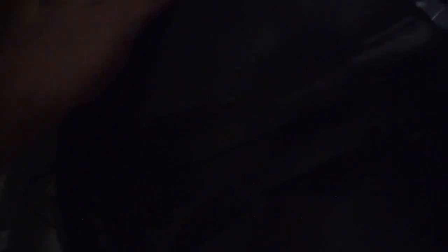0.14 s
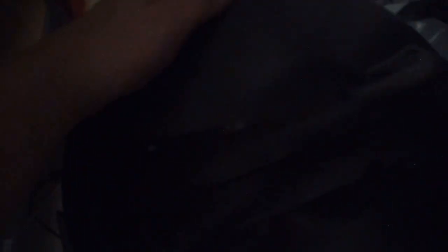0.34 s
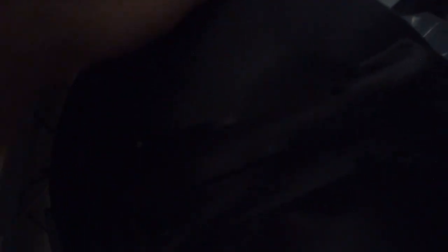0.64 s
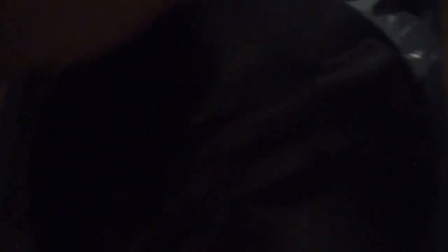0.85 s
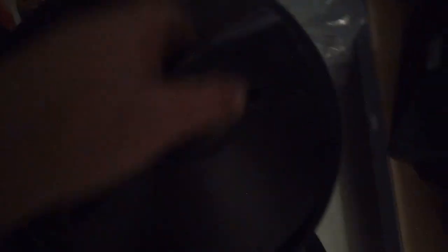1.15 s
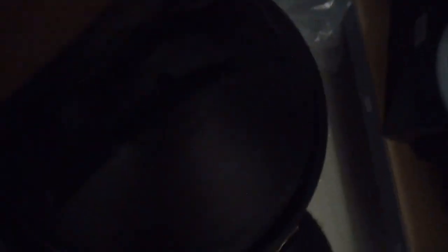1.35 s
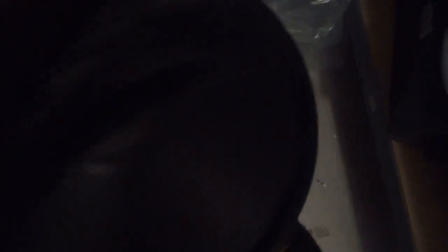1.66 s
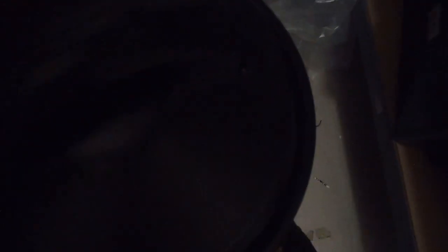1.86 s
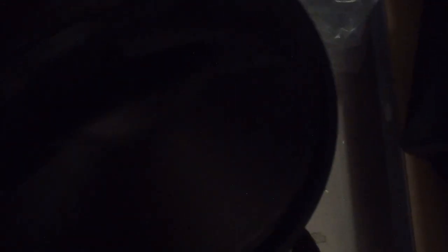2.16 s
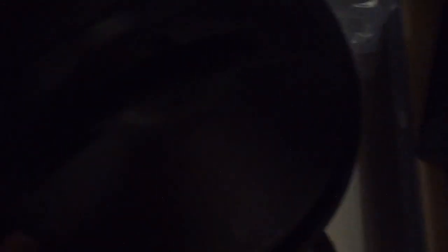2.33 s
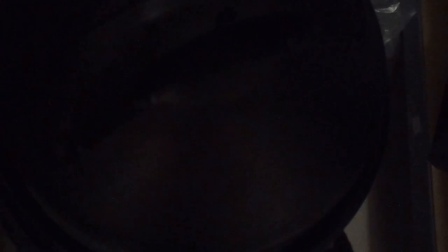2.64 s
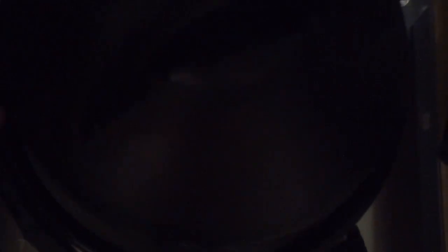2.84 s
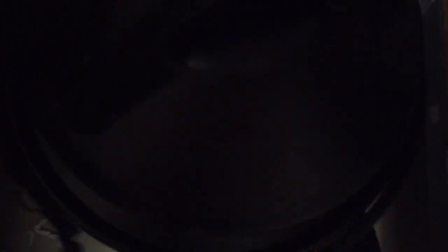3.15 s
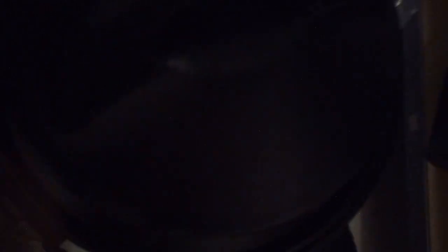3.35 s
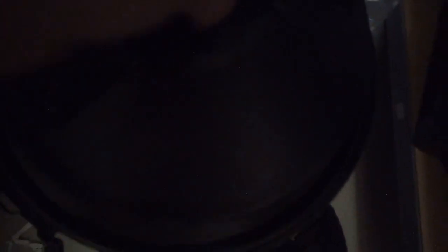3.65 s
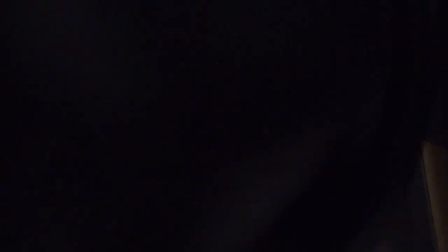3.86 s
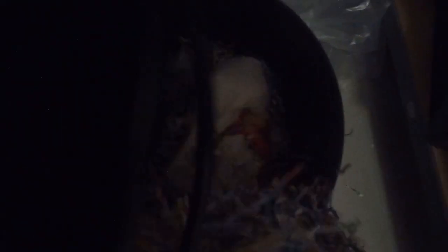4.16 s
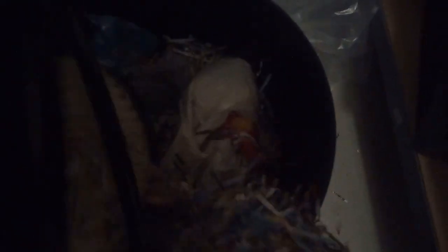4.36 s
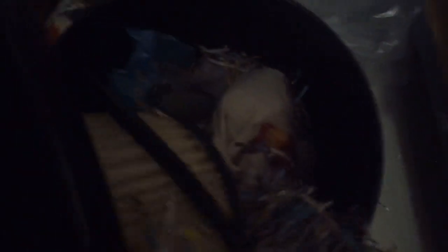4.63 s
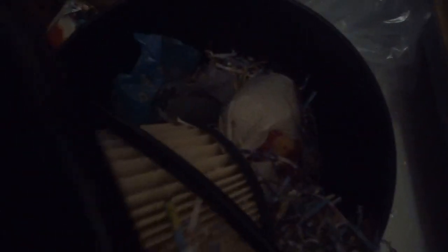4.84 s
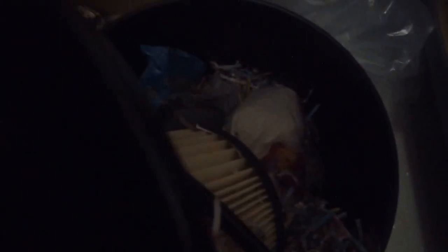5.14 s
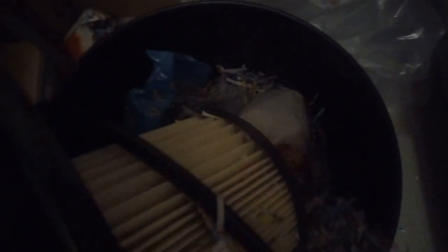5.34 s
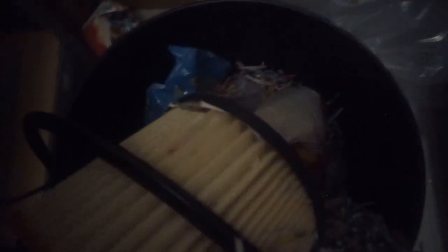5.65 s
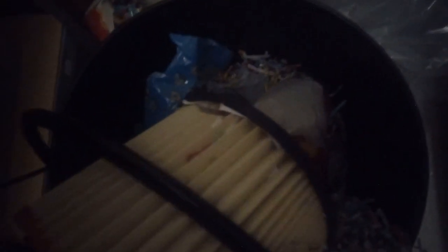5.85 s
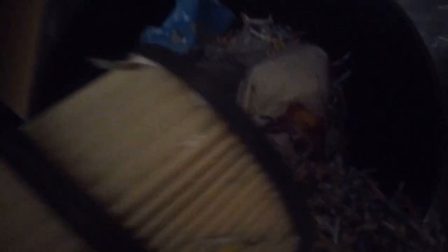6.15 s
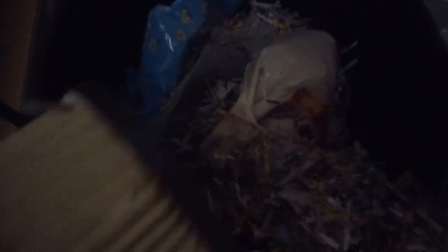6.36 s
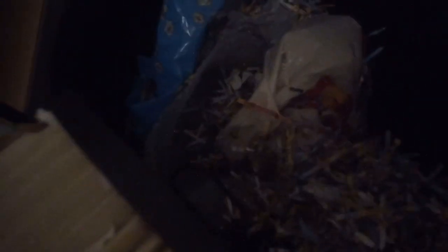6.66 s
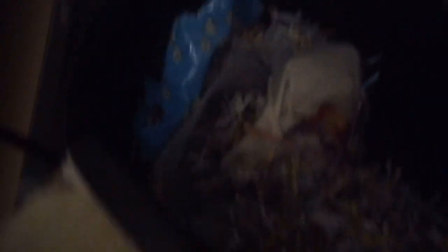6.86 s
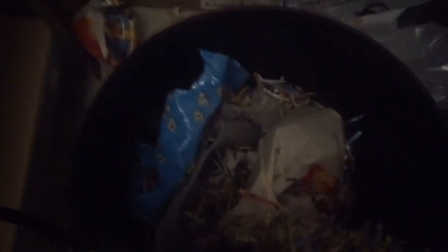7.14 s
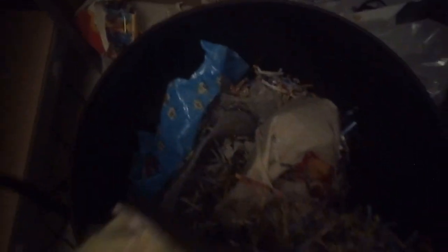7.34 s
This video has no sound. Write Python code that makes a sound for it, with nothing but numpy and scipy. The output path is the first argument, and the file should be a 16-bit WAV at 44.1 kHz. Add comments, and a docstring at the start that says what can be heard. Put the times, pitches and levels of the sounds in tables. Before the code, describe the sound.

Close, slightly dull small microphone indoors: loud vacuum motor whine and hissing exhaust for barely half a second, then switch-off and a smooth descending wind-down over about two seconds. After a brief lull come plastic snaps, gritty scrapes and hollow drum thuds, busiest around the middle, thinning into light ticks, a soft bump and dry rustling in a quiet room.

```python
"""A shop vacuum's motor whines at full speed, is switched off and coasts to rest near a small microphone indoors.
Its tones are multiples of the shaft rate, coloured by housing and outlet; its air is shaped turbulent noise.
Then the plastic lid is unlatched, dragged off the drum and knocked about; dry debris and the filter rustle.
Friction is stroked noise, knocks are decaying noise, thuds are pushed resonances and slides are gliding noise.
A short diffuse tail and a quiet room lie behind; microphone and input limit band and peaks."""
import sys
import numpy as np
from scipy import signal
from scipy.fft import rfft, irfft, next_fast_len
from scipy.io import wavfile
from scipy.ndimage import uniform_filter1d, map_coordinates

SR = 44100
rng = np.random.default_rng(int(sys.argv[2]) if len(sys.argv) > 2 else 0)


def inscribe(sig):
    """Save sig as 16-bit PCM at rate SR to the path in sys.argv[1].

    A 1-D sig is mono; a 2-D sig holds one channel per row.
    Samples are clipped to [-1, 1] before scaling.
    """
    pcm = np.round(np.clip(np.atleast_2d(sig).T, -1, 1) * 32767)
    wavfile.write(sys.argv[1], SR, pcm.astype(np.int16))


N = 330750


def amp(db):
    """Level law: decibels to an amplitude ratio."""
    return 10 ** (np.asarray(db) / 20)


def unit(x):
    """Normalisation to an rms of 1."""
    return x / np.sqrt(np.mean(x ** 2) + 1e-20)


def along(points, hz):
    """Interpolation of (frequency, value) points on a logarithmic frequency axis."""
    f, v = np.transpose(points)
    return np.interp(np.log(hz + 1), np.log(f + 1), v)


def wobble(rate):
    """Slow random modulation: a smooth curve through random knots, rate of them a second."""
    knots = rng.standard_normal(int(N * rate / SR) + 4)
    return map_coordinates(knots, [np.arange(N) * rate / SR])


def filtered(x, response):
    """Linear filtering: the spectrum times a complex response of frequency."""
    m = next_fast_len(N + SR // 2)
    return irfft(rfft(x, m) * response(np.fft.rfftfreq(m, 1 / SR)), m)[..., :N]


def ringing(modes):
    """Modal superposition: a sum of causal resonances of alternating sign."""
    def response(f):
        total = 0
        for k, (centre, width, db) in enumerate(modes):
            damping = 1j * f * width
            total = total + (-1) ** k * amp(db) * damping / (centre * centre - f * f + damping)
        return total
    return response


def shaped(points):
    """Spectral colouring: a real gain of frequency."""
    return lambda f: amp(along(points, f))


def rush(response, grit_db, streak_db=0):
    """Coloured noise of rms 1: grit makes it lumpy, streaks are narrow resonances that come and go."""
    gritty = rng.standard_normal(N) * amp(grit_db * wobble(400))
    spectrum = signal.stft(gritty, nperseg=512)[2]
    field = uniform_filter1d(rng.standard_normal(spectrum.shape), size=2, axis=0)  # across frequency
    field = uniform_filter1d(field, size=12, axis=1)  # across time
    streaked = signal.istft(spectrum * amp(streak_db * unit(field)), nperseg=512)[1][:N]
    return unit(filtered(streaked, response))


ATTACK_S, RELEASE_S = 0.059, 0.31  # time to rise by 30 dB; time to fall by 60 dB


def strokes(rows):
    """Energy addition: strokes rise, hold and die exponentially; one gain for each level column."""
    start, length, db, *over = np.transpose(rows)[..., None]
    t = np.arange(0, N / SR + .01, .002)
    rise_db = 30 * np.clip(start - t, 0, 9) / ATTACK_S
    fall_db = 60 * np.clip(t - start - length, 0, 9) / RELEASE_S
    shape_db = db - rise_db - fall_db
    gains = []
    for over_db in [0, *over]:
        power = np.sum(amp(2 * (shape_db + over_db)), 0)
        gains.append(np.interp(np.arange(N) / SR, t, np.sqrt(power)))
    return gains


# Spectrum of the quiet room: (frequency [Hz], relative density [dB])
QUIET_ROOM = [(25, -14.5), (100, 9), (300, -2), (600, -7.5), (1500, -9), (3000, -14), (4500, -14.5),
              (6000, -10.5), (16000, -8)]


def hush():
    """Stationary background noise: a faint coloured rush."""
    return amp(-65.5) * rush(shaped(QUIET_ROOM), grit_db=-0.5)


def room(x):
    """Diffuse reverberation: exponentially decaying noise convolved with the sound."""
    t = np.arange(SR // 2) / SR
    tail = rng.standard_normal(len(t)) * amp(-60 * t / 0.12)  # t60 0.12 s
    delayed = np.pad(x, (300, 0))  # samples
    return signal.fftconvolve(delayed, tail / np.linalg.norm(tail))[:N]


# Low handling rumble at the microphone: (time [s], length [s], rumble level [dB])
HANDLING_RUMBLES = [(0, 0.58, -48), (.72, 0.12, -40), (1.15, .26, -38), (1.5, 0.036, -49.5)]
# Spectrum of the rumble: (frequency [Hz], relative density [dB])
RUMBLE_COLOUR = [(25, -33), (60, 0), (130, 0), (170, -1.5), (250, -24)]


def handling_rumble():
    """Low-frequency contact noise: low handling rumble at the microphone, in strokes."""
    return strokes(HANDLING_RUMBLES)[0] * amp(3 * wobble(12)) * rush(shaped(RUMBLE_COLOUR), grit_db=1)


# Resonances of the plastic lid: (frequency [Hz], width [Hz], relative level [dB])
LID_MODES = [(590, 78, -10.5), (772, 38, 2.5), (835, 66, 3), (977, 200, -6), (1240, 88, 1), (1433, 200, -4),
             (1772, 42, -6.5)]
# Resonances of the drum: (frequency [Hz], width [Hz], relative level [dB])
DRUM_MODES = [(80.5, 71, -5.5), (139, 14, 2.5), (198, 23, 4), (254, 41, 6.5), (297, 44, 7.5),
              (351, 202, -3.5), (610, 89, -9)]
# Thuds: (time [s], relative tone level [dB], tone frequency [Hz], rise time constant [s], t60 [s],
#         relative push level [dB])
THUD_EVENTS = [(0.36, -27, 137.6, 0.051, 0.22, -69), (3.211, -25.5, 215, 0.013, 0.21, -34.5),
               (3.564, -37.5, 88, 0.0083, 0.21, -31), (3.693, -19, 234.3, 0.014, 0.11, -37.5),
               (3.837, -27, 98.2, 0.0023, 0.16, -54.5), (3.852, -16.5, 305, 0.0016, 0.034, -30.5),
               (4.036, -24, 837, 0.002, 0.25, -26), (4.081, -18, 290.5, 0.018, 0.32, -50),
               (4.246, -25.5, 92.5, 0.0045, 0.13, -20.5), (4.547, -27.5, 204.8, 0.0022, 0.13, -29.5),
               (4.771, -24, 139.8, 0.06, 0.22, -69), (6.294, -22.5, 138, 0.0028, 0.13, -23),
               (6.298, -29, 683, 0.0012, 0.077, -56), (6.419, -25, 213, 0.0029, 0.064, -58)]


def thuds():
    """Impulsive excitation: a soft push rings drum and lid; one hollow tone swells and dies above the rest."""
    hollow, push = np.zeros((2, N + SR))
    t = np.arange(SR // 2) / SR
    for s, db, hz, rise, t60, push_db in THUD_EVENTS:
        at = slice(round(s * SR), round(s * SR) + len(t))
        swell = amp(db + 1.5 - 60 * t / t60) * (1 - np.exp(-t / rise))
        hollow[at] += swell * np.sin(2 * np.pi * hz * t)
        push[at] += amp(push_db + 25.0 - 60 * t / 0.014) * rng.standard_normal(len(t))
    drum = filtered(push[:N], ringing(DRUM_MODES))
    lid = amp(-22.0) * filtered(push[:N], ringing(LID_MODES))
    return hollow[:N] * amp(1.3 * wobble(40)) + drum + lid


# Spectra of contact noise: (frequency [Hz], relative density [dB])
RASP_COLOUR = [(2500, -20), (3300, -5.5), (4200, -2), (4600, 1), (5000, -3), (5700, -4), (7000, -6),
               (9000, -17)]
SCUFF_COLOUR = [(1100, -24.5), (1700, -6), (2200, -0.5), (2700, -1.5), (3300, -4), (4200, -25)]
FIZZ_COLOUR = [(6500, -22), (8000, 4), (12000, 12.5), (14000, 4), (16000, 3)]
# Knocks and ticks: (time [s], relative crack level [dB], scuff over crack [dB], lid over crack [dB],
#                    relative fizz level [dB], t60 of the shared decay [s])
KNOCK_EVENTS = [(0.609, -18, -20, -28, -33, 0.21), (2.588, -27, -2, -7, -38, 0.055),
                (3.0634, -34, -9, -29, -43, 0.44), (3.1823, -44, -9, 10, -35, 0.35),
                (3.2356, -17.5, -21, -27, -23.5, 0.36), (3.548, -26, -12, -11, -39, 0.14),
                (3.5767, -29.5, -3.5, 5, -31, 0.19), (3.7007, -14.5, -11.5, -17, -31, 0.097),
                (3.7892, -17, -26, -2, -30, 0.067), (3.852, -19.5, -6.5, -10, -56, 0.14),
                (3.9287, -43.5, -10, 8, -42, 0.048), (4.0367, -18.5, -3, 3.5, -42, 0.25),
                (4.1189, -22.5, -23, -17, -35.5, 0.079), (4.2501, -24, -5.5, 2, -41, 0.061),
                (4.2736, -6, -10, -12, -34.5, 0.15), (4.3246, -8.5, -16, -18, -32, 0.11),
                (4.375, -13, -12, -15, -32.5, 0.18), (4.4, -8.5, -14, -17, -31.5, 0.18),
                (4.6647, -13.5, -10, -10.5, -33.5, 0.17), (5.215, -37.5, -23, -39, -45, 0.29),
                (5.2462, -30, -20, -7, -48, 0.19), (5.3152, -34.5, -22, -27, -38, 0.11),
                (5.4604, -33.5, -5.5, -6, -47, 0.15), (5.5661, -27.5, -2.5, -31, -36, 0.047),
                (5.641, -34.5, -4.5, -9, -32, 0.25), (5.675, -30, -10, -15, -28, 0.061),
                (5.7638, -42, 2, -15, -47, 0.16), (6.038, -34.5, -6, -25, -31, 0.11),
                (6.2979, -29.5, 2, 4, -51, 0.11), (6.5924, -44.5, -8, -15, -31.5, 0.37),
                (7.0438, -51.5, -27, -26, -31, 0.151), (7.3325, -51.5, -5, -19, -29, 0.13),
                (7.3669, -51.5, -13, -23.5, -27, 0.078)]


def shaken(envelope, response):
    """Random excitation: noise under an envelope through a response of normalised power."""
    mean_power = np.mean(abs(response(np.linspace(1, SR / 2, 4000))) ** 2)
    return filtered(envelope[:N] * rng.standard_normal(N), response) / np.sqrt(mean_power)


def knocks():
    """Impact and decay: each contact is a crack and a dying rattle."""
    rasp, scuff, lid, fizz = np.zeros((4, N + SR))
    t = np.arange(SR // 2) / SR
    for s, db, scuff_db, lid_db, fizz_db, t60 in KNOCK_EVENTS:
        at = slice(round(s * SR), round(s * SR) + len(t))
        crack = 1 + 0.22 * amp(-60 * t / .012)
        fall = amp(db - 8 - 60 * t / max(t60, .01)) * crack
        rasp[at] += fall
        scuff[at] += amp(scuff_db) * fall
        lid[at] += amp(lid_db) * fall * amp(-60 * t / 0.49)
        fizz[at] += amp(fizz_db + 43) * fall * amp(-60 * t / 0.39)
    direct = shaken(rasp, shaped(RASP_COLOUR)) + shaken(scuff, shaped(SCUFF_COLOUR))
    return direct + shaken(lid, ringing(LID_MODES)) + shaken(fizz, shaped(FIZZ_COLOUR))


# Hollow scrapes: (time [s], length [s], start frequency [Hz], end frequency [Hz], relative level [dB])
SLIDE_EVENTS = [(5.765, .05, 2300, 1700, -54), (6.0, .15, 2000, 700, -58)]
SLIDE_KNOTS = 550  # random knots per second; more widen the band


def slides():
    """Quadrature modulation: random curves on a falling carrier make a band of noise that glides down."""
    time, out = np.arange(N) / SR, np.zeros(N)
    for s, length, from_hz, to_hz, db in SLIDE_EVENTS:
        hz = np.interp(time, [s, s + length], [from_hz, to_hz])
        gate = np.interp(time, [s - .015, s, s + length, s + length + 0.027], [0, 1, 1, 0])
        turn = 2 * np.pi * np.cumsum(hz) / SR
        band = wobble(SLIDE_KNOTS) * np.sin(turn) + wobble(SLIDE_KNOTS) * np.cos(turn)
        out += amp(db + 3 * wobble(60)) * gate * band
    return out


# Plastic and debris rubbing: (time [s], length [s], rasp level [dB], scuff over rasp [dB],
#                             lid over rasp [dB], drum over rasp [dB])
RUBBING_STROKES = [(3.06, 0.067, -52, -14, -4, -6.5), (3.19, 0.094, -31.5, -6.5, -6, -4.5),
                   (3.58, 0.028, -43.5, -4, -5.5, -8), (3.71, 0.074, -30, -9, -10, -2.5),
                   (3.85, 0.087, -42, -5.5, -9, -8), (4.06, 0.026, -36.5, 0, 1, 4),
                   (4.14, 0.072, -42.5, -19, -10, -6), (4.29, 0.16, -30, -2, -6, -19.5),
                   (4.5, 0.11, -36.5, -0.5, 1.5, -6.5), (4.69, 0.045, -33, -1.5, -2.5, -11.5),
                   (4.76, 0.081, -39, -4.5, -3, -8), (4.92, 0.068, -50.5, -8.5, -19, -31),
                   (5.04, 0.075, -57, -7.5, -14, -21), (5.26, 0.026, -49.5, 3.5, -1, -14),
                   (5.33, .13, -46, -9.5, -18, -18), (5.52, 0.15, -52.5, -7, -16, -20),
                   (5.72, 0.083, -59, -6, -3, -5.5), (5.84, 0.05, -53, -25, -29, -21),
                   (5.99, 0.075, -46, -4, -14, -25), (6.07, 0.22, -46, -13.5, -40, -28),
                   (6.33, .04, -46, -8, -7, 1.5), (6.4, 0.088, -46, -14.5, -32, -8.5),
                   (6.61, 0.062, -57.5, -13.5, -19, -15), (7.48, 0.072, -54, -11.5, -12.5, -15)]
FIZZ_DB, FIZZ_GROWS = 19, 1.4  # gain [dB] and power of the rasp gain: harder rubbing is brighter


def rubbing():
    """Stick-slip friction: gritty noise heard directly and through the lid and the drum."""
    rasp, scuff, lid, drum = strokes(RUBBING_STROKES)
    fizz = amp(FIZZ_DB) * rasp ** FIZZ_GROWS
    snag = wobble(45)  # the surfaces catch and let go
    catch = amp(1.5 * snag)
    rasp = rasp * catch * rush(shaped(RASP_COLOUR), grit_db=2.5, streak_db=3)
    scuff = scuff * catch * rush(shaped(SCUFF_COLOUR), grit_db=2.5, streak_db=4)
    lid = lid * catch * rush(ringing(LID_MODES), grit_db=2.5)
    drum = drum * amp(1.2 * wobble(25)) * rush(ringing(DRUM_MODES), grit_db=0.5)
    fizz = fizz * amp(3 * snag) * rush(shaped(FIZZ_COLOUR), grit_db=3.5)
    return rasp + scuff + lid + drum + fizz


FULL_HZ, OFF_S = 506.5, .6129  # shaft turns per second under power; the switch opens [s]
BRUSH_DRAG, BEARING_DRAG, AIR_DRAG = 54.5, 67.6, 388  # braking at full speed [Hz per s]
AIR_POWER = 2.43  # air drag grows with this power of speed


def shaft():
    """Rotational deceleration: steady turns per second, then braked to rest by air, bearings and brushes."""
    share = np.linspace(1, 0, 4000)  # of full speed
    braking = BRUSH_DRAG + BEARING_DRAG * share + AIR_DRAG * share ** AIR_POWER
    reached_s = OFF_S + np.cumsum(FULL_HZ / len(share) / braking)
    return np.interp(np.arange(N) / SR, reached_s, FULL_HZ * share)


def speed_decades():
    """Logarithmic speed: shaft rate in decades relative to full speed."""
    return np.log10(shaft() / FULL_HZ + 1e-9)


# Spectra of the exhaust jet, the duct and the casing: (frequency [Hz], relative density [dB])
JET_COLOUR = [(1200, -39), (1900, 2), (2300, 3), (3200, 3), (3700, 3), (4300, -1), (6000, -2), (9000, -2),
              (16000, -2.5)]
DUCT_COLOUR = [(330, -8), (480, -8.5), (620, -5), (800, 0), (1300, 1), (1700, 0.5), (2200, -16.5)]
CASING_COLOUR = [(120, -43.5), (180, 1), (230, 5.5), (330, -4), (450, -29)]
# (level at full speed [dB], loss for a tenfold drop in speed [dB])
JET_AIR, DUCT_AIR, CASING_AIR = (-22, 36.1), (-34.5, 41.3), (-41.5, 30)


def air():
    """Aerodynamic power law: turbulence in jet, duct and casing falls with shaft speed."""
    decades = speed_decades()
    jet_db, duct_db, casing_db = (db + loss_db * decades for db, loss_db in (JET_AIR, DUCT_AIR, CASING_AIR))
    jet = amp(jet_db + 0.59 * wobble(15)) * rush(shaped(JET_COLOUR), grit_db=0.5, streak_db=1.0)
    duct = amp(duct_db + 0.62 * wobble(17)) * rush(shaped(DUCT_COLOUR), grit_db=-1.5, streak_db=3.5)
    casing = amp(casing_db + 0.73 * wobble(16.0)) * rush(shaped(CASING_COLOUR), grit_db=4.0)
    return jet + duct + casing


BLADES, BARS = 9, 22  # fan blades; commutator bars
SHAKE_DB = 40  # loss for a tenfold drop in speed [dB]
ARC_DB = 13  # the commutator is louder while current flows [dB]
# Answers to unbalance, its octave and the fan blades: (frequency [Hz], level before speed and nearness [dB])
HOUSING_ANSWER = [(100, -54), (125, -39), (165, -51.5), (198, -27), (212, -27), (225, -40), (250, -27),
                  (268, -32), (297, -22.5), (320, -27), (332, -36), (350, -31), (395, -33), (412, -48),
                  (430, -35), (510, -36)]
OCTAVE_ANSWER = [(200, -58), (250, -42), (300, -30), (350, -52), (420, -60), (470, -48), (600, -54),
                 (690, -56), (725, -40), (770, -45), (830, -36), (900, -45), (1013, -40.5)]
OUTLET_ANSWER = [(700, -51), (830, -37.5), (1100, -46), (1470, -34), (1740, -42), (2050, -37), (2280, -27),
                 (3300, -25.5), (3700, -23), (4050, -30), (4350, -24), (4560, -32)]
# The commutator tone at each pitch: (frequency [Hz], level without current, before nearness [dB])
COMMUTATOR_ANSWER = [(850, -70), (1200, -51), (1500, -56), (2000, -56), (3000, -47), (3900, -44),
                     (4600, -46), (5500, -51), (6500, -56), (8000, -52), (10500, -43)]
# The whine grows as the microphone nears: (time [s], gain [dB])
NEARNESS = [(0, -0.5), (.2, 2), (.45, 3.5)]
# Blade harmonics: (multiple of the blade rate, full-speed level without current [dB])
BLADE_HARMONICS = [(2, -36), (3, -40)]
# Bar harmonics: (multiple of the bar rate, level at full speed [dB])
BAR_HARMONICS = [(2, -39), (3, -43), (4, -45)]
# Weaker orders heard once the current is off: (shaft order, level over the commutator tone [dB])
COASTING_ORDERS = [(5, -43.5), (7, -33.5), (8, -28), (13, -24.5), (15, -32), (18, -15), (20, -17),
                   (21, -17.5), (24, -15.5)]
# Shaft orders heard only while current flows: (shaft order, level [dB])
POWERED_ORDERS = [(.5, -51), (1.5, -55), (2.5, -42), (3.5, -49), (4, -46), (5, -51), (6, -44), (7, -49),
                  (8, -52), (10, -51), (11, -54)]


def motor():
    """Order synthesis: unbalance, fan blades and brushes crossing commutator bars sound at shaft multiples."""
    time, shaft_hz, decades = np.arange(N) / SR, shaft(), speed_decades()
    near_db = np.interp(time, *np.transpose(NEARNESS))
    turn = 2 * np.pi * np.cumsum(shaft_hz) / SR
    current = np.interp(time, [OFF_S, OFF_S + .02], [1, 0])

    def tone(order, db):
        """Modal interference: a gliding tone sweeps through room resonances and breaks up."""
        breakup = (1 - current) * min(order / BLADES, 1)  # high orders flutter more deeply
        flutter = amp((1.3 + 2.4 * breakup) * wobble(90) + 2.8 * breakup * wobble(14))
        in_band = np.clip((SR / 2 - order * shaft_hz) / 2000, 0, 1)  # no aliasing
        phase = order * turn + (.12 + .6 * breakup) * wobble(40)
        return np.sqrt(2) * amp(db) * flutter * in_band * np.sin(phase)

    shake_db = near_db + SHAKE_DB * decades
    whine = tone(1, shake_db + along(HOUSING_ANSWER, shaft_hz))
    whine = whine + tone(2, shake_db + along(OCTAVE_ANSWER, 2 * shaft_hz))
    whine = whine + tone(BLADES, shake_db + along(OUTLET_ANSWER, BLADES * shaft_hz))
    bar_db = along(COMMUTATOR_ANSWER, BARS * shaft_hz) + ARC_DB * current + near_db
    whine = whine + tone(BARS, bar_db)
    whine = whine + sum(tone(BLADES * k, db + 4 * current + 55 * decades) for k, db in BLADE_HARMONICS)
    whine = whine + sum(tone(BARS * k, db + 25 * decades) for k, db in BAR_HARMONICS)
    whine = whine + (1 - current) * sum(tone(round(order), bar_db + db) for order, db in COASTING_ORDERS)
    pull = sum(tone(order, db) for order, db in POWERED_ORDERS)
    sparks = amp(-24) * rush(shaped(FIZZ_COLOUR), grit_db=1.5)
    turning = np.clip(shaft_hz / 15 - 2.3, 0, 1)  # fades out at the slowest turns
    return whine * turning + current * (pull + sparks)


def scene():
    """Superposition: motor, air, rumble, and the switch click and lid contacts, with a diffuse tail on the
    click and contacts, over the room."""
    contacts = rubbing() + slides() + knocks() + thuds()
    machine = motor() + air()
    return (machine + handling_rumble() + contacts + amp(-9.5) * room(contacts) + hush())[None]


# Response of the small microphone: (frequency [Hz], gain [dB])
MIC_RESPONSE = [(30, -15), (65, -2), (5500, -2), (6500, -9.5), (7800, -31), (10000, -41.5), (13500, -52),
                (15000, -34.5), (16000, -35.5)]
# Spectrum of the input's own hiss: (frequency [Hz], relative density [dB])
INPUT_HISS = [(6000, -22), (9000, -6), (13500, -5.5), (15000, 6), (16000, 1)]
TOP_HZ = 15830  # band limit


def record(dry):
    """Transducer limits: the microphone is dull above the upper mids; the input rounds peaks and cuts the band."""
    x = filtered(dry, shaped(MIC_RESPONSE)) + amp(-84.5) * rush(shaped(INPUT_HISS), grit_db=2.5)
    x = x / (1 + abs(x / .43) ** 3) ** (1 / 3)  # soft ceiling at 0.43 of full scale
    return filtered(x, lambda hz: hz < TOP_HZ)


dry = scene()
out = record(dry)
inscribe(out)
```